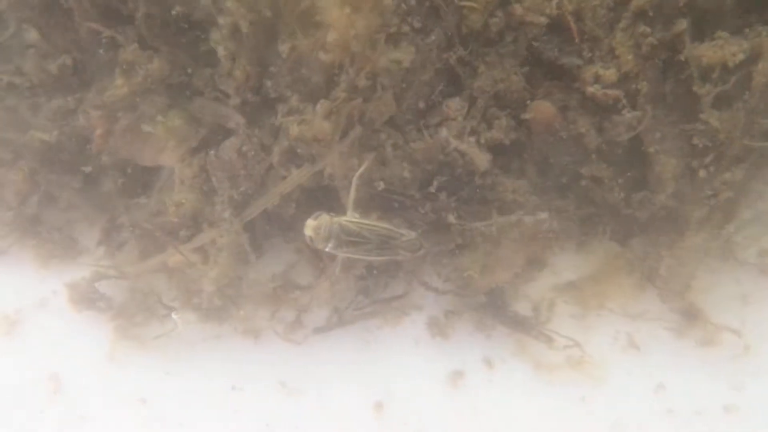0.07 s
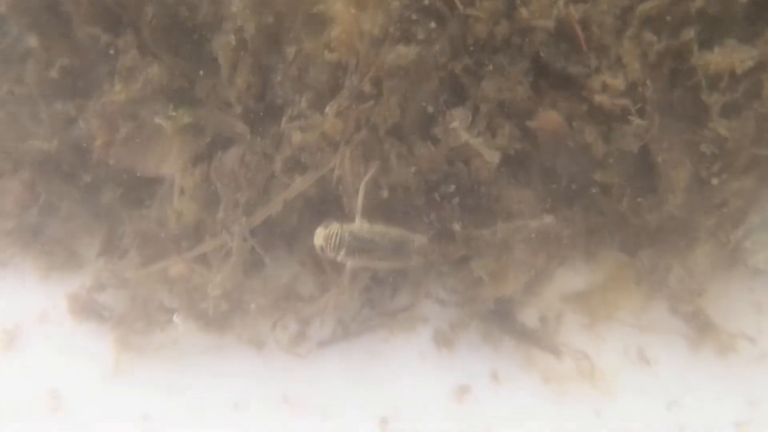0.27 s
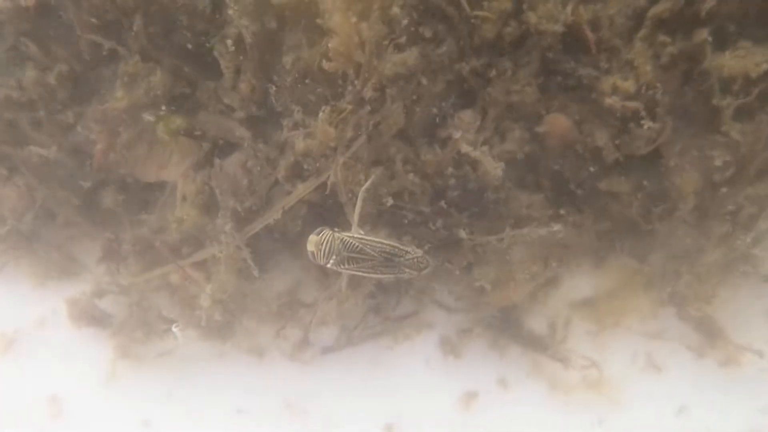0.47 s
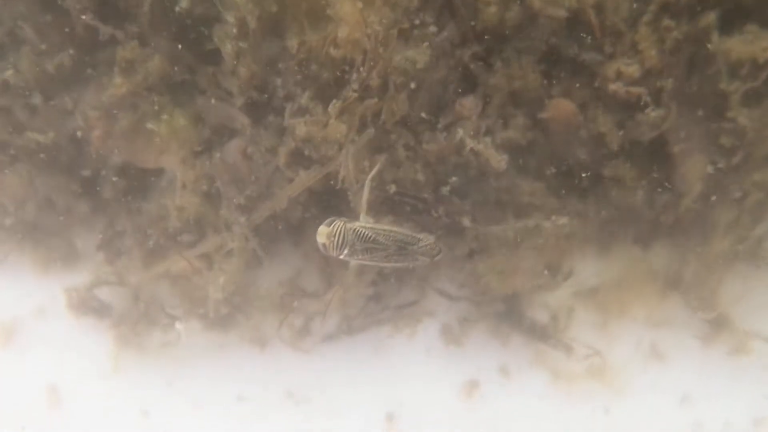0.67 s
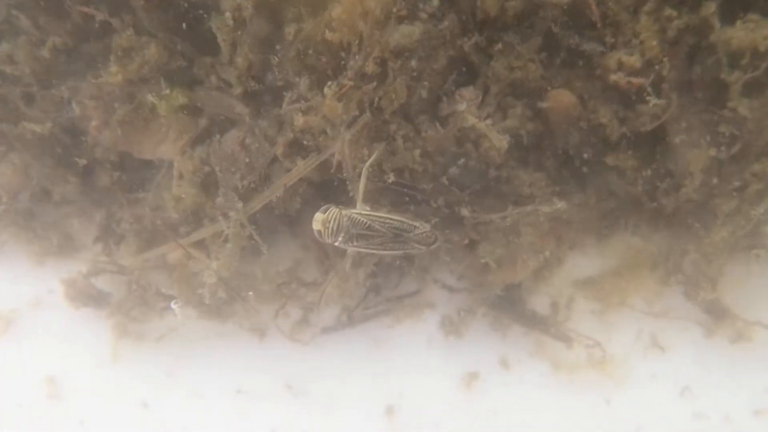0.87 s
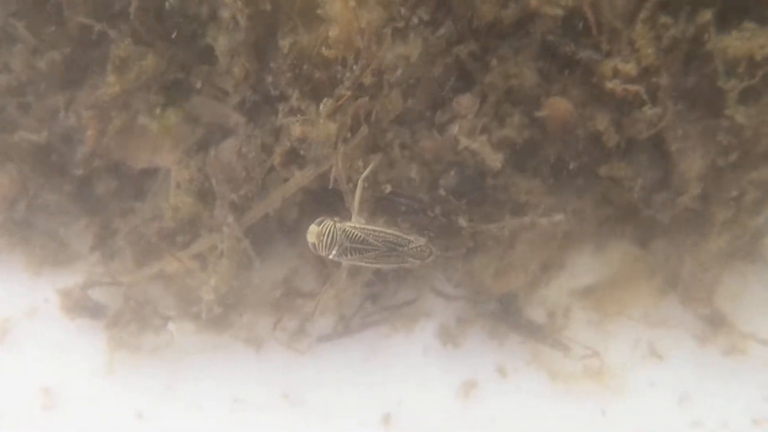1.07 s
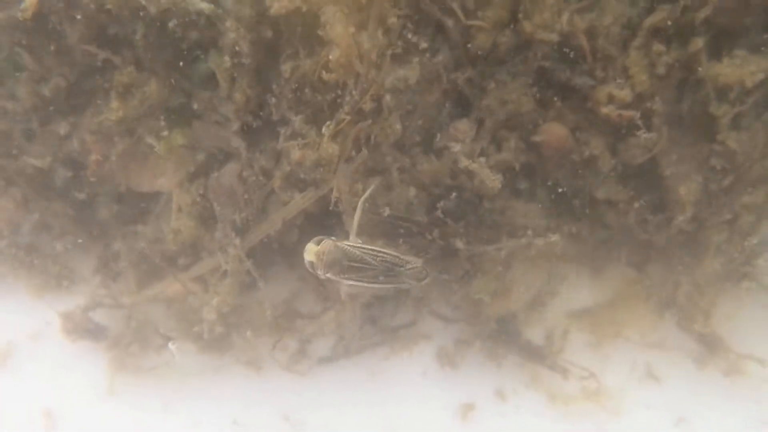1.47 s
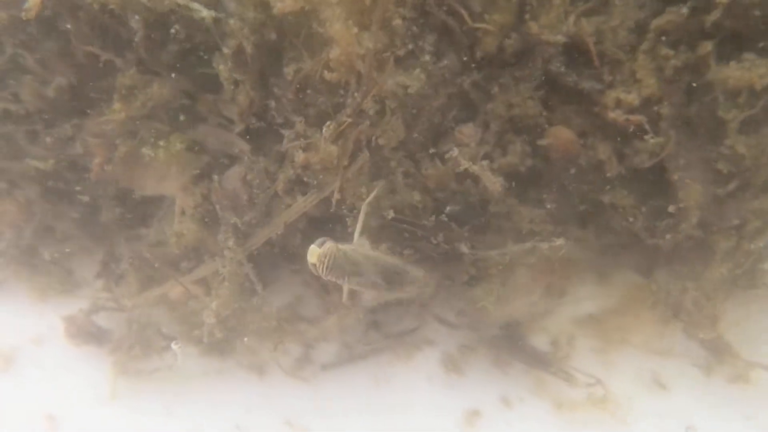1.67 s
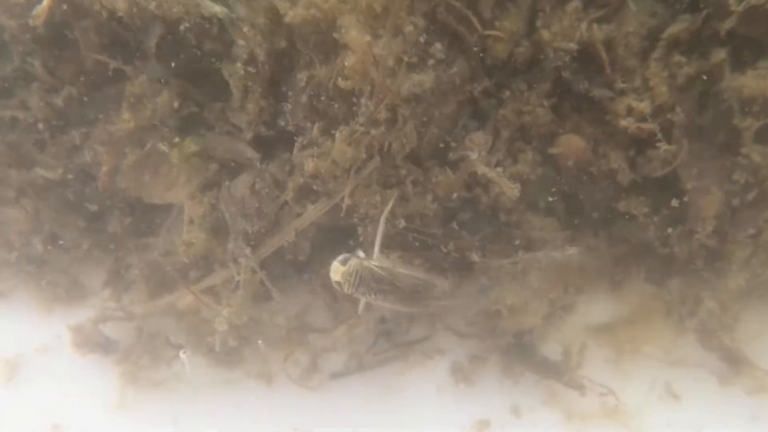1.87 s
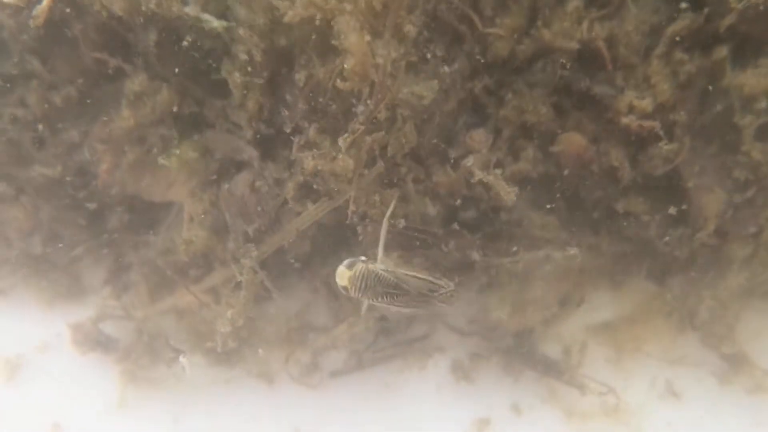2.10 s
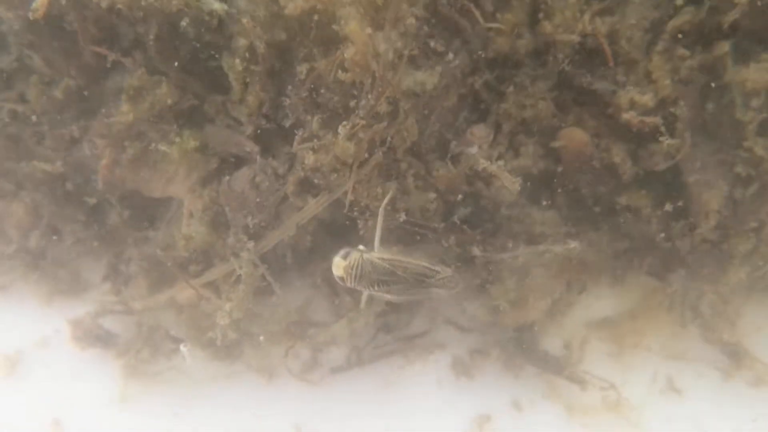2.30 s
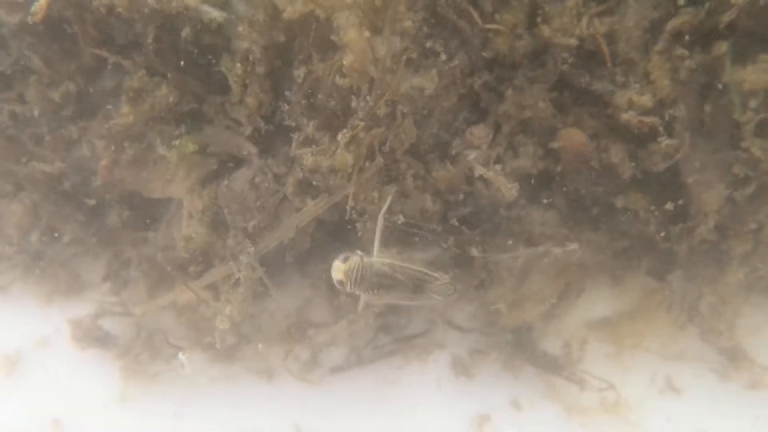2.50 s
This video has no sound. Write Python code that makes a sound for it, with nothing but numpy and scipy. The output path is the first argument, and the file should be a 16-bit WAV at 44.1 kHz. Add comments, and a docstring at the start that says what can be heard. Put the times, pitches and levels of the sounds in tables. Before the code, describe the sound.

Close handling noise on a camera held over still water: muffled rubs and thumps come in uneven clusters over constant hum and hiss. The lens motor chirps faintly at first, skin scuffs once, and a faint drip-like blip comes last.

```python
"""Hand-held camera over still water

Fingers rub, bump and once scuff the case, which hums near 400 Hz; some taps land right by the
left microphone. The lens motor chirps in short steps over steady hiss, with tiny clicks and
a faint drip-like blip near the end. A limiter ducks everything after each hard bump."""
import sys
import numpy as np
from scipy.fft import rfft, irfft, next_fast_len
from scipy.io import wavfile
from scipy.ndimage import uniform_filter1d, map_coordinates

SR = 44100
rng = np.random.default_rng(int(sys.argv[2]) if len(sys.argv) > 2 else 0)


def dump(signal):
    """Clip the signal to [-1, 1] and save it as 16-bit WAV at the path in sys.argv[1]."""
    limited = np.clip(np.atleast_2d(signal).T, -1, 1)
    pcm = np.round(limited * 32767).astype(np.int16)
    wavfile.write(sys.argv[1], SR, pcm)


N = 116865


def amp(db):
    """Decibels to gain."""
    return 10 ** (np.asarray(db) / 20)


def unit_rms(x):
    """Scale to rms 1."""
    return x / np.sqrt(np.mean(x ** 2) + 1e-20)


def log_interp(points, hz):
    """Interpolate (f/Hz, value) points on a log axis."""
    f, v = np.transpose(points)
    return np.interp(np.log(hz + 1), np.log(f + 1), v)


def pan(db):
    """Stereo gains for a left-minus-right level."""
    return amp([[db / 2], [-db / 2]])


def wobble(rate_hz):
    """Smooth random curve, rate_hz knots a second."""
    knots = rng.standard_normal(int(N * rate_hz / SR) + 4)
    return map_coordinates(knots, [np.arange(N) * rate_hz / SR])


def filtered(x, response):
    """Zero-phase filter with gain response(hz)."""
    size = next_fast_len(N + SR // 2)
    return irfft(rfft(x, size) * response(np.fft.rfftfreq(size, 1 / SR)), size)[..., :N]


def noise(spectrum, coherence):
    """Coloured stereo noise, rms 1, of given left-right coherence."""
    def mid_side_gains(hz):
        angle = np.arccos(np.clip(log_interp(coherence, hz), -1, 1)) / 2
        return amp(log_interp(spectrum, hz)) * [np.cos(angle), np.sin(angle)]
    mid, side = filtered(rng.standard_normal((2, N)), mid_side_gains)
    return unit_rms(np.array([mid + side, mid - side]))


def levelled(x, span_s):
    """Hold a noise's level steady over spans longer than span_s."""
    power = uniform_filter1d(np.mean(x ** 2, axis=0), int(span_s * SR))
    return x / np.sqrt(np.abs(power) + 1e-6)


# hiss spectrum: f/Hz, relative density/dB
HISS_SPECTRUM = [(2500, -34.5), (4300, -21.5), (5200, -7), (6200, 5.5), (7500, -1), (8900, 5), (9600, 1),
                 (10400, -8.5), (15800, -8.5)]


def microphone_hiss():
    """Steady treble noise, nearly independent left and right."""
    return amp(-51.5) * noise(HISS_SPECTRUM, coherence=[(6000, .03)])


# hum spectrum: f/Hz, relative density/dB
HUM_SPECTRUM = [(20, -27.5), (70, -10.5), (130, -10), (260, -13.5), (340, -7), (402, 3), (470, -9.5),
                (640, -23.5), (760, -24), (1000, -28), (1550, -31), (1900, -45.5), (2400, -62), (3500, -73)]
# hum stereo image: f/Hz, coherence/0-1
HUM_COHERENCE = [(50, .9), (130, 0.64), (400, 0.75), (1500, 0.83), (4000, .3)]


def case_hum():
    """The held case hums throughout: noise peaking near 400 Hz, its level wavering."""
    level_db = -26.5 + 1.8 * wobble(rate_hz=27)
    hum = levelled(noise(HUM_SPECTRUM, HUM_COHERENCE), span_s=.093)
    return pan(db=-1.5) * amp(level_db) * hum


# motor runs: t/s, step count, level/dB
MOTOR_RUNS = [(.036, 4, -47.5), (0.369, 3, -48), (0.702, 7, -47)]


def lens_motor(t):
    """Evenly spaced whines on the right, a little higher at both ends of each step."""
    period_s, whine_s, whine_hz, bend_hz = .0667, .029, 6192, 132.6
    out = np.zeros(N)
    for start_s, steps, db in MOTOR_RUNS:
        running = (t >= start_s) & (t < start_s + steps * period_s)
        in_step_s = (t - start_s) % period_s
        edge = np.minimum(np.abs(2 * in_step_s / whine_s - 1), 1)  # 0 mid-whine, 1 at its ends
        hz = whine_hz + bend_hz * edge ** 4 + 18 * wobble(rate_hz=150)
        envelope = running * np.sqrt(1 - edge ** 6)
        out += amp(db) * envelope * np.sin(2 * np.pi * np.cumsum(hz) / SR)
    return pan(db=-13) * out


# clicks, last row the blip: t/s, level/dB, f/Hz, half-width/s
CLICKS_AND_BLIP = [(0.575, -42.5, 1880, 0.0012), (1.079, -53.5, 2470, .0006), (1.11, -50, 2540, 0.00081),
                   (1.408, -47, 6200, 0.00058), (1.4977, -35, 6920, 0.00091), (2.331, -44, 2740, 0.0005),
                   (2.361, -34, 6100, 0.001), (2.503, -37.5, 1450, 0.0055)]


def clicks_and_blip(t):
    """Puffs of band noise: tiny clicks, and near the end one faint pitched blip like a water drip."""
    out = np.zeros(N)
    for peak_s, db, pitch_hz, width_s in CLICKS_AND_BLIP:
        width_oct = .41 * np.sqrt(.00072 / width_s)  # longer is purer
        white = rng.standard_normal(N)
        band = filtered(white, lambda hz: np.exp(-(np.log2((hz + 1) / pitch_hz) / width_oct) ** 2))
        out += amp(db) * unit_rms(band) * np.exp(-((t - peak_s) / width_s) ** 2)
    return pan(db=-3.5) * out


# scuff: t/s, level/dB, Gaussian sigma/s
SKIN_SCUFF = (1.917, -28, 0.0095)
# scuff spectrum: f/Hz, relative density/dB
SKIN_SPECTRUM = [(300, -19.5), (850, 8), (1300, -2.5), (2200, -20), (3200, -37), (4500, -46), (5400, -12.5),
                 (6400, 0), (7300, -21), (9000, -25), (15000, -48.5)]


def skin_scuff(t):
    """One brief dry hiss of skin sliding across the shell."""
    peak_s, db, sigma_s = SKIN_SCUFF
    envelope = np.exp(-((t - peak_s) / sigma_s) ** 2 / 2)
    return pan(db=-.5) * amp(db) * envelope * noise(SKIN_SPECTRUM, coherence=[(1000, .23)])


# finger drags: t/s, length/s, level/dB, rise/share of length, rumble/dB re level
FINGER_DRAGS = [(.228, 0.066, -8, 0.5, -11.5), (0.287, .06, -8.5, 0, -15.5), (0.556, 0.043, -17, 0.7, -9.5),
                (.715, 0.022, -32.5, 0.4, 3), (0.751, 0.026, -17.5, 0.4, -14.5),
                (0.905, 0.049, -20.5, .5, -11.5), (0.979, 0.17, -16, 0.7, -6),
                (1.169, 0.024, -16.5, 0.7, -11), (1.417, 0.12, -10.5, .65, -5.5),
                (1.542, 0.079, -14, 0.1, -7), (1.609, 0.069, -12, 0.4, -7), (1.68, .032, -7, 0.6, -12.5),
                (1.708, 0.13, -15, 0.1, -2.5), (1.842, .04, -14, 0, -1.5), (1.887, 0.076, -17, 0, -4.5),
                (1.956, 0.039, -15.5, .55, -11), (2.096, 0.12, -27.5, 0.4, 3), (2.193, .1, -20, .4, -4.5),
                (2.29, .06, -10, 1, -8.5), (2.402, 0.23, -28.5, 0.4, 0.5)]
# rubbed case spectrum: f/Hz, relative density/dB
RUB_SPECTRUM = [(100, -35.5), (220, -14.5), (300, -9), (395, 4.5), (460, -6), (560, -17.5), (680, -36),
                (800, -26), (1200, -48), (1800, -57), (2600, -70.5), (5000, -82.5)]
# camera shake spectrum: f/Hz, relative density/dB
RUMBLE_SPECTRUM = [(20, -16.5), (45, -4), (80, 2.5), (130, 3.5), (190, 2), (260, -5), (400, -26.5),
                   (800, -69)]
# stereo image of both: f/Hz, coherence/0-1
CASE_COHERENCE = [(50, 1), (130, 0.66), (400, 0.94), (1500, 0.1), (4000, .5)]


def finger_rubs(t):
    """Each drag swells and lets go, ringing the case and shaking the whole camera."""
    force, shake = np.zeros((2, N))
    for start_s, length_s, db, rise, rumble_db in FINGER_DRAGS:
        crest_s = start_s + length_s * np.clip(rise, .05, .95)
        drag = amp(db) * np.interp(t, [start_s, crest_s, start_s + length_s], [0, 1, 0]) ** .74
        force += drag
        shake += amp(rumble_db) * drag
    case = force * levelled(noise(RUB_SPECTRUM, CASE_COHERENCE), span_s=.018)
    flutter = amp(1.6 * wobble(rate_hz=70))
    rumble = shake * levelled(noise(RUMBLE_SPECTRUM, CASE_COHERENCE), span_s=.11)
    return flutter * (case + rumble)


def struck_mode(age_s, hz, t60_s, contact_s=.0019):
    """Softly struck decaying mode, silent before age 0."""
    age_s = np.maximum(age_s, 0)
    attack = 1 - np.exp(-(age_s / contact_s) ** 2)
    return np.sin(2 * np.pi * hz * age_s) * amp(-60 * age_s / t60_s) * attack


# knocks on the case: t/s, push/dB, ring/dB, thud/dB, tick/dB, left minus right/dB
CASE_BUMPS = [(.249, -5.5, -4, -12.5, -31, -3), (0.3065, -26.5, -1, -6, -27.5, 1),
              (0.322, -29.5, -36, -8, -42.5, 0), (.459, 7.5, -4, 5.5, -18, 0.5), (.4645, 4, 1, 2, -26, 2.5),
              (1.174, -40, -18, -11.5, -59, 7), (1.2376, -0.5, -43, -24, -23.5, 11.5),
              (1.2863, -33, -23, -4.5, -60, -5.5), (1.293, -33, -1.5, -16.5, -61, -2.5),
              (1.3866, 1.5, -1.5, -15.5, -19.5, 4), (1.3909, -17.5, -7, 2, -50, 1),
              (1.511, -1.5, -15, 0.5, -27, 2.5), (1.6829, -2, -0.5, -22, -28, 6.5),
              (1.695, -5, -13.5, -12.5, -32, -3.5), (1.7032, -11, -13.5, -8, -23.5, -3),
              (1.8445, -6, 0.5, -8.5, -29, 0), (2.0084, 3, -29.5, -16.5, -21, 12),
              (2.1343, -7, -36, -21, -39, 14.5), (2.158, -14, -24, -19, -56.5, 16),
              (2.198, -6.5, -2, -39, -56, 0), (2.204, -29, -29.5, -2.5, -50, -2.5),
              (2.262, -9.5, -22, -18.5, -49.5, 8.5), (2.3481, 0, -6, -7.5, -26, 21),
              (2.44, -12, -19, -16, -60, 13)]
# tick spectrum: f/Hz, relative density/dB
TICK_SPECTRUM = [(300, 4.5), (900, 6), (1800, -9.5), (3200, -17), (4800, -23), (7000, -25), (15000, -41)]


def case_bumps(t):
    """Each knock: to-and-fro push, case ring, low thud, tick; the right microphone gets it first."""
    push_hz, push_width_s, tick_width_s, left_lag_s = 256, .0022, .0012, .00016
    out = np.zeros((2, N))
    for start_s, push_db, ring_db, thud_db, tick_db, pan_db in CASE_BUMPS:
        age_s = t - start_s - np.array([[left_lag_s], [0]])
        swing_s = age_s - .5 / push_hz  # 0 where the push reverses
        push = -np.sin(2 * np.pi * push_hz * swing_s) * np.exp(-(swing_s / push_width_s) ** 2)
        ring = struck_mode(age_s, hz=392.2, t60_s=.068)
        thud = struck_mode(age_s, hz=134.6, t60_s=.058)
        tick = noise(TICK_SPECTRUM, coherence=[(1000, .4)]) * np.exp(-(swing_s / tick_width_s) ** 2)
        body = amp(push_db) * push + amp(ring_db) * ring + amp(thud_db) * thud
        out += pan(pan_db) * (body + amp(tick_db) * tick)
    return out


def scene():
    """Sum at the two microphones."""
    t = np.arange(N) / SR
    events = finger_rubs(t) + case_bumps(t) + clicks_and_blip(t) + skin_scuff(t) + lens_motor(t)
    return events + case_hum() + microphone_hiss()


def record(dry):
    """Stereo-linked limiter, fast attack and slow release, then a low-pass."""
    ceiling, release_s, cutoff_hz = .8, .11, 15800
    t = np.arange(N) / SR
    excess_nepers = np.log(np.maximum(np.abs(dry).max(axis=0) / ceiling, 1))
    release = np.exp(-t / release_s)
    cut_nepers = np.maximum.accumulate(excess_nepers / release) * release
    gain = np.exp(-uniform_filter1d(uniform_filter1d(cut_nepers, size=9), size=7))
    return filtered(dry * gain, lambda hz: hz < cutoff_hz)


dry = scene()
out = record(dry)
dump(out)
```